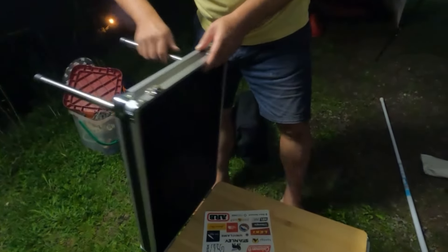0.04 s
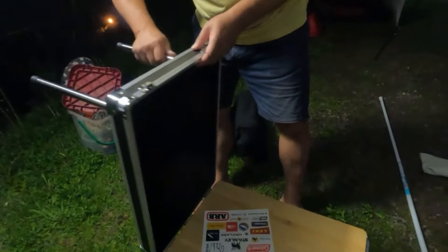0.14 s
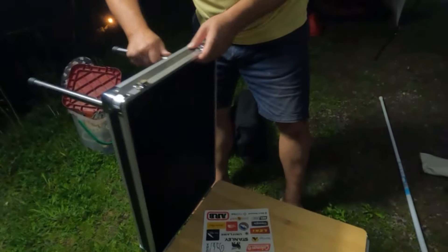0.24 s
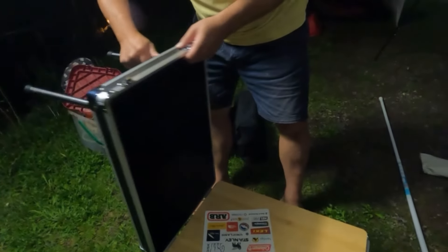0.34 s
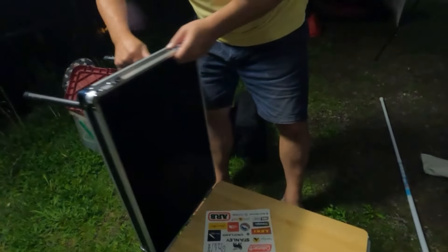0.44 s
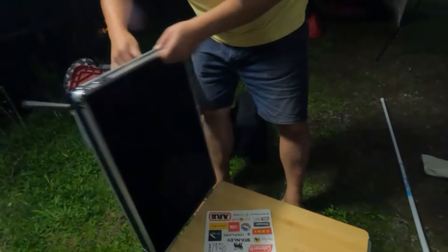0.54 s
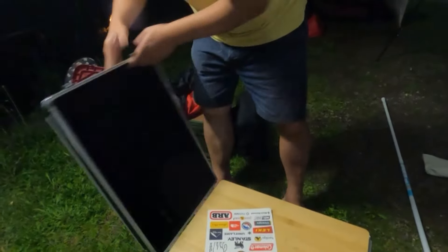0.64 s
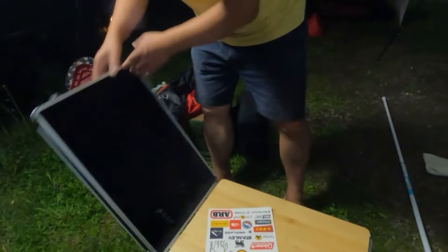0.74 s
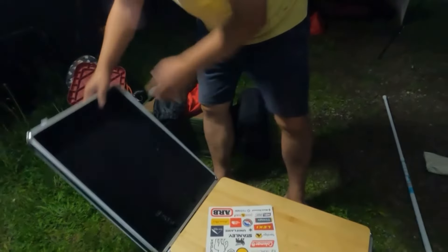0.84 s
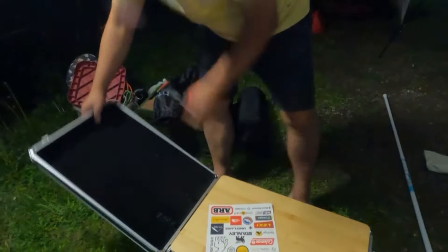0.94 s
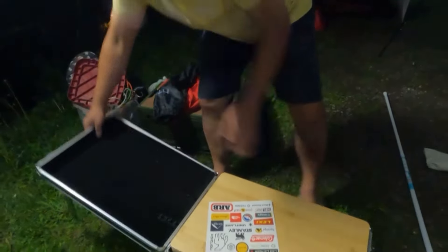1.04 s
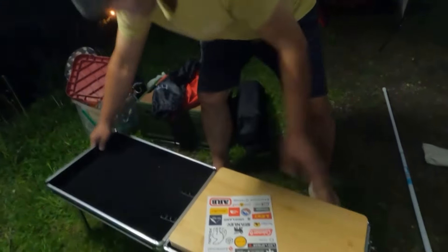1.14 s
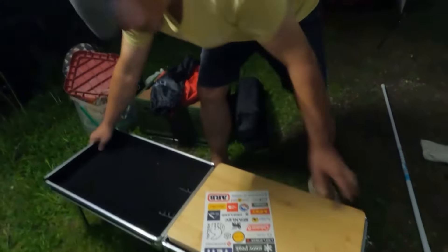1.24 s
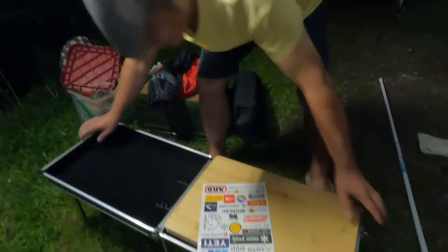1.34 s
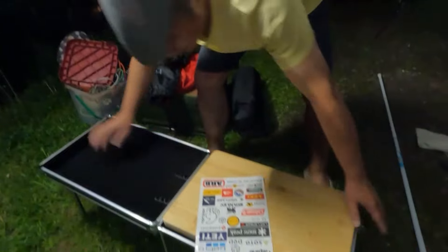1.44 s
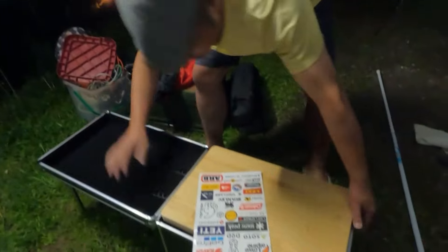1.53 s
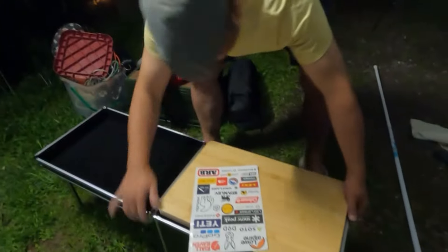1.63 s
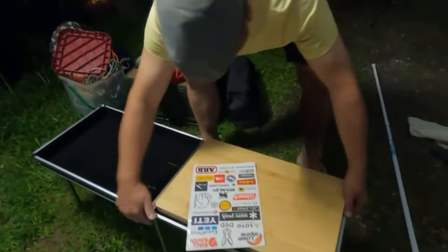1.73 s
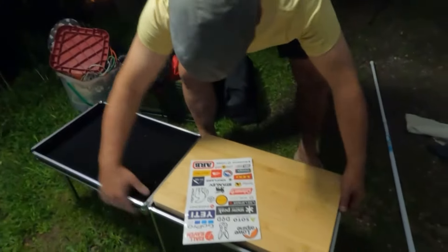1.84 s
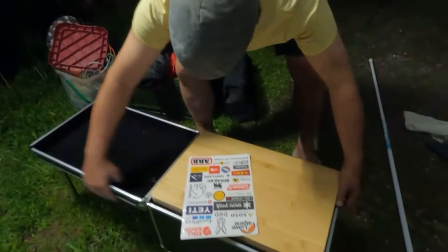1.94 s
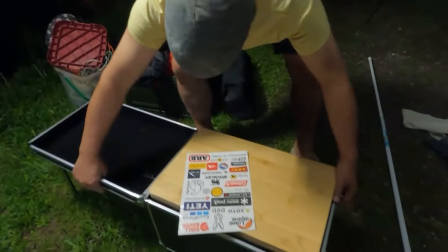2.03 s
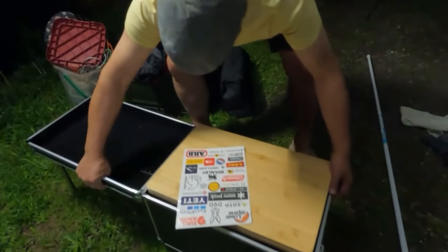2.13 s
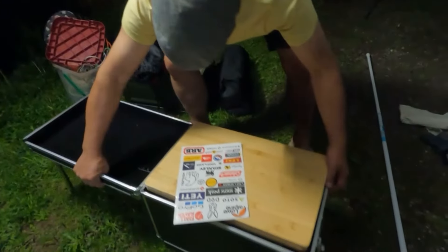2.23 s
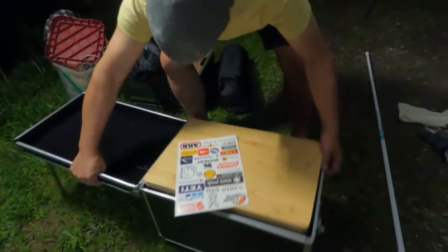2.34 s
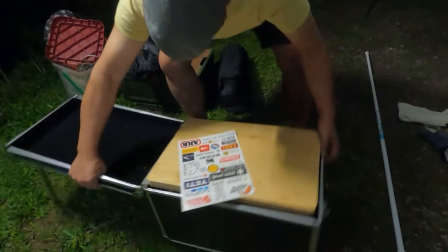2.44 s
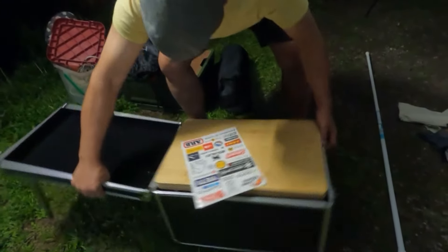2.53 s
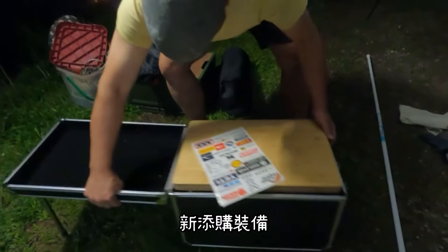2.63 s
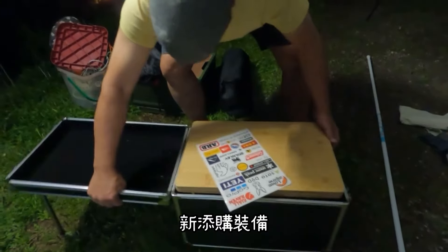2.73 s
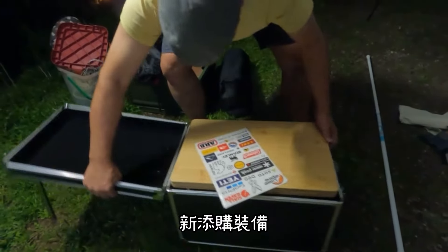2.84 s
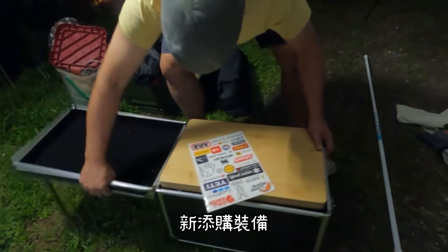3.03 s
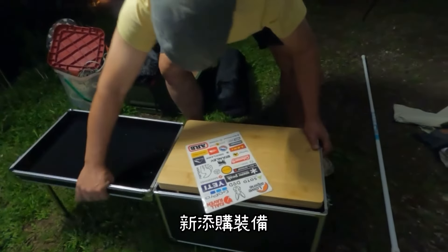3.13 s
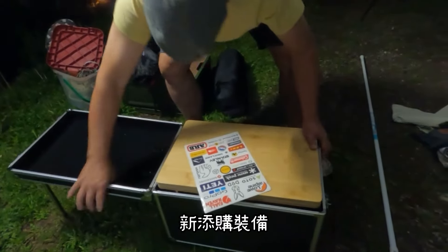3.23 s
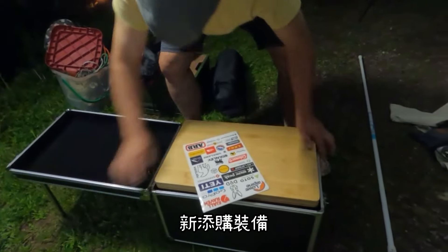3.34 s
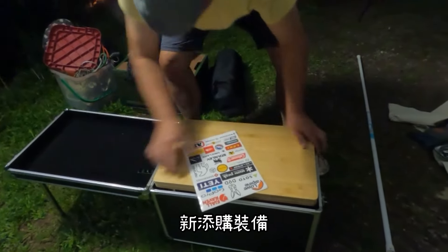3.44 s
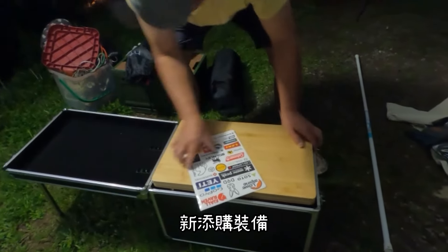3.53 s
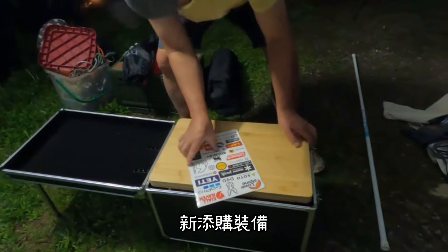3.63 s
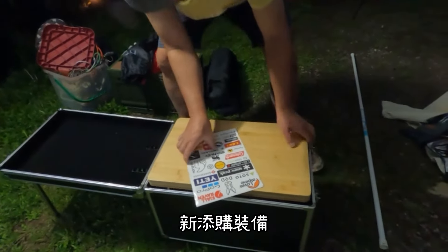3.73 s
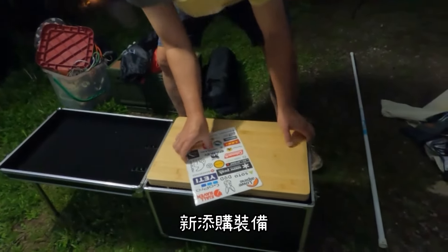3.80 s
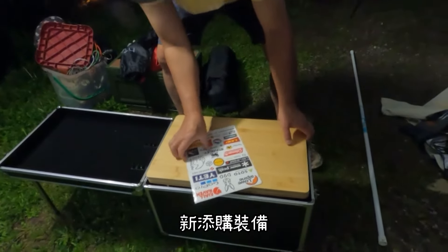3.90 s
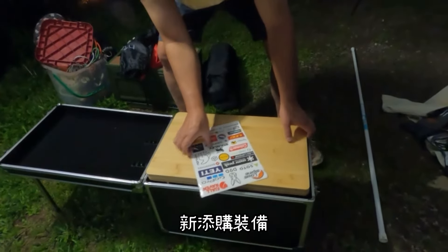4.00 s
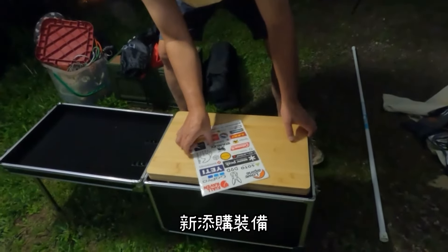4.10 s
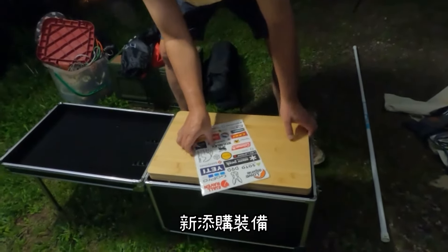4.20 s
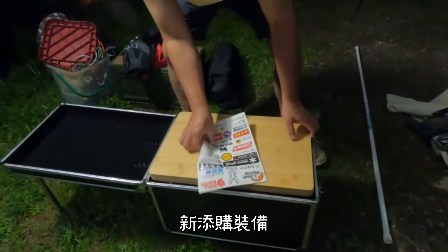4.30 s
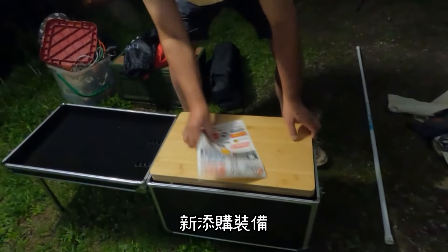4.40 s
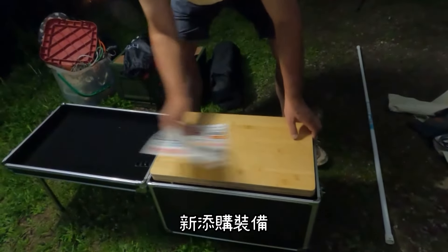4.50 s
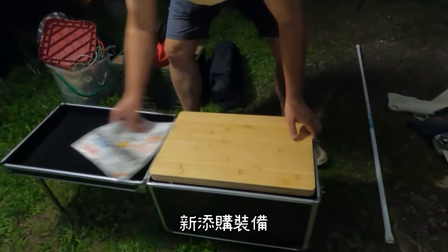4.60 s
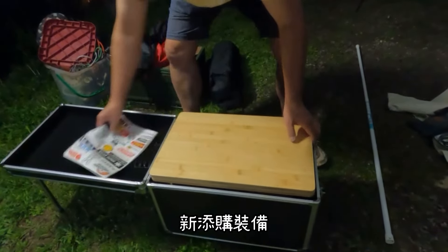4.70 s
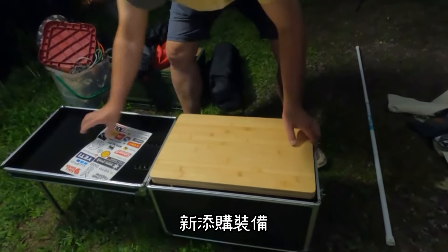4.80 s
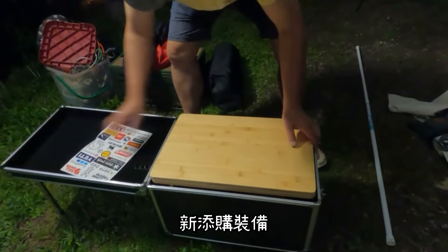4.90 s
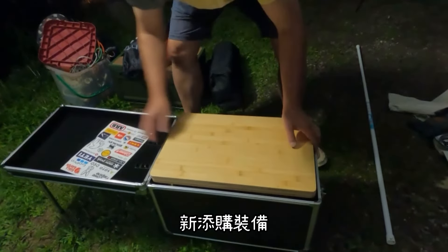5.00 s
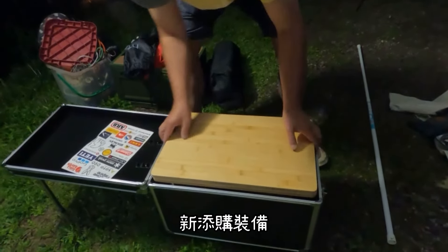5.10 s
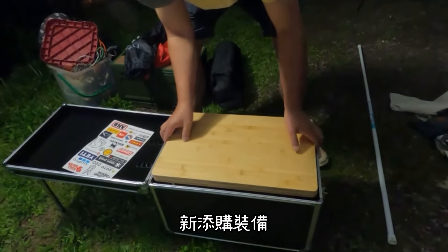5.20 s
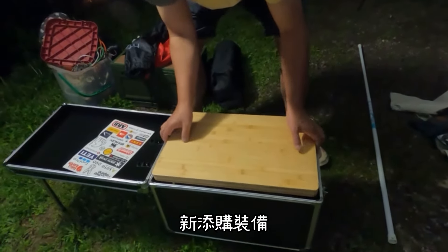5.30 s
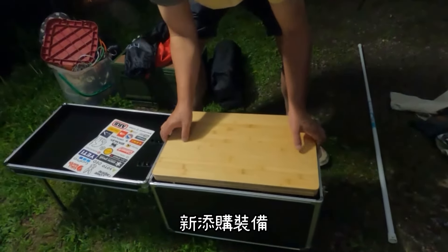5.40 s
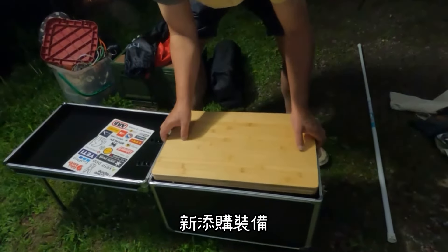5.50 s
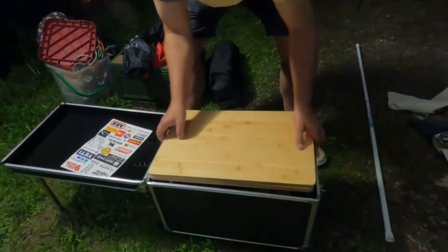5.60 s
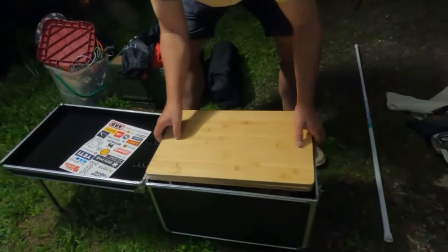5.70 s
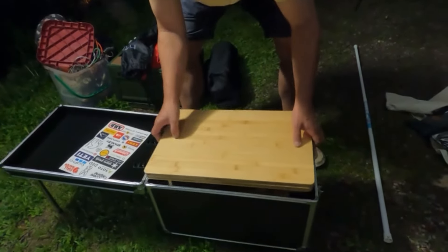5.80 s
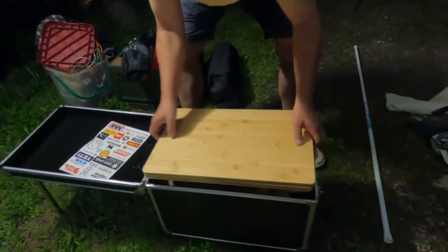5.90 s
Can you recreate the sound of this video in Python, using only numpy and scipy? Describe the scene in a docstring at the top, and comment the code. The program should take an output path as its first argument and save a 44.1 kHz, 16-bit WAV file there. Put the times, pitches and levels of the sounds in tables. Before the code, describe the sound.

A folding camp table with a metal frame and wooden top is opened close by, outdoors at night, over a faint, steady hiss of distant insects. It starts with soft rubbing and low rumbling, and a dull bump at 0.7 seconds. At 1.2 seconds a panel lands with a loud thud and clack. Sharp metal clacks follow around 1.6, 1.8 and 2.1 seconds, with the pivots rubbing between them. From 2.6 to 3.2 seconds the legs scrape and judder over the ground amid a quick run of hollow knocks, loudest at 3.1. From 3.3 seconds a stiff sticker sheet slides over the wood in short hissing strokes, growing louder, popping crisply at 4.4 and dropping into a tray with a clack at 4.7. Lighter knocks come between 5.1 and 5.4 seconds and again at 5.9 as the top is nudged into place.

```python
"""Soft rubbing, then clacks and thuds: a folding camp table is opened on grass at night.
Blows excite the damped modes of its panels and aluminium frame; its legs drag by stick-slip friction.
A sheet of stickers hisses off the wooden top, pops as it bends and is dropped in the tray,
and the top is nudged into place. Behind it all, many insects merge into a steady hiss."""
import sys
import numpy as np
from scipy import signal
from scipy.fft import rfft, irfft, next_fast_len
from scipy.io import wavfile

SR = 44100
rng = np.random.default_rng(int(sys.argv[2]) if len(sys.argv) > 2 else 0)


def dump(signal):
    """Clip the signal to [-1, 1] and save it as 16-bit WAV at the path in sys.argv[1]."""
    limited = np.clip(np.atleast_2d(signal).T, -1, 1)
    pcm = np.round(limited * 32767).astype(np.int16)
    wavfile.write(sys.argv[1], SR, pcm)


N = 262395
TIME = np.arange(N) / SR

# modes of panel, frame and bent sheet: (frequency [Hz], relative level [dB], t60 [s])
PANEL_MODES = [(58.6, 4, 0.2), (80.8, 4, 0.3), (108.2, 1.5, 0.16), (136, 0, 0.28), (158.6, -1.5, 0.34),
               (181.6, 4.5, 0.15), (233, 5, 0.083), (271.5, -1, 0.23), (298, 3.5, 0.094),
               (369.4, -2.5, 0.17), (441, 5, 0.066), (500, 2.5, 0.05)]
FRAME_MODES = [(436, -6, 0.083), (530, -22, 0.098), (710.6, -7.5, 0.13), (994, 1, 0.073), (1066, 2, 0.11),
               (1320, 2, 0.07), (1354, 13, 0.018), (1595, 3, 0.028), (1615, -7, 0.13), (1918, 5.5, 0.046),
               (2056, 5.5, 0.029), (2604, -20, .06), (2760, 10, 0.041), (3250, -14, 0.084),
               (3576, 15.5, 0.046), (3792, 15, 0.039), (4740, -14, 0.042), (4910, 4.5, 0.084),
               (6600, -22, .05)]
SHEET_MODES = [(383, -21.5, 0.11), (944, -5.5, 0.042), (1220, 0, 0.099), (1580, 1, 0.075),
               (1960, -3, 0.024), (2730, 10.5, 0.011), (4940, 11, 0.011)]
# noise spectra: (frequency [Hz], relative spectral density [dB])
FITTINGS_SPECTRUM = [(300, 2.5), (520, -2), (780, -2), (1150, -8), (1700, -3), (2300, 1.5), (3700, -2.5),
                     (4300, -6.5), (6800, -3.5), (8500, -16), (11000, -13), (13000, -22), (15500, -51)]  # dense small modes of tubes and fittings
RUMBLE_SPECTRUM = [(25, -7), (55, 6.5), (80, 10.5), (120, -6.5), (200, 1), (280, 0), (400, -12),
                   (700, -16.5), (1500, -59.5)]
PIVOT_SPECTRUM = [(300, -13), (750, -9), (1000, -0.5), (1300, 3.5), (1600, 1), (1950, 1), (2600, -3.5),
                  (3600, -1.5), (5000, -22), (9000, -58)]
RUSTLE_SPECTRUM = [(1500, -73.5), (3000, -33), (5000, 6.5), (7000, 3), (8500, -8.5), (10500, -4),
                   (12500, -11.5), (15500, -44)]
SCRAPE_SPECTRUM = [(250, -4.5), (500, 3), (750, 3), (1050, 6), (1600, -3.5), (3500, -8), (7000, -18.5),
                   (8500, -27.5), (12000, -30), (15500, -52)]
SHEET_SPECTRUM = [(500, 4), (1100, 16), (1800, 6.5), (3000, 3), (5500, 5), (7000, 1), (8500, -5.5),
                  (11000, 0.5), (13000, -11.5), (15500, -26)]
INSECT_SPECTRUM = [(2600, -53.5), (3200, -17.5), (3550, 3), (3900, 4), (4150, 1.5), (4500, -6.5),
                   (5500, -14.5), (7500, -21), (10000, -35)]
AIR_SPECTRUM = [(20, 0.5), (70, -1.5), (140, 0), (230, -1), (400, -11), (850, -19.5), (1150, -10.5),
                (1700, -16.5), (2800, -19), (6000, -28), (8500, -35), (11000, -27.5), (15000, -63)]
# likeness of left and right for near and far sources: (frequency [Hz], correlation [0-1])
NEAR_COHERENCE = [(90, .999), (250, .992), (500, 0.95), (1200, 0.87), (3000, 0.72), (7000, 0.81),
                  (13000, 0.63)]
FAR_COHERENCE = [(150, 0.35), (1000, 0.54), (4000, 0.45), (12000, .3)]
# blows on a panel: (time [s], thud pitch [Hz], relative thud level [dB],
# relative knock level [dB], clack over knock [dB])
PANEL_BUMPS = [(0.679, 166, -24.5, -45, -21), (1.235, 206, -16, -24, -3), (1.249, 97, -15.5, -33, -11),
               (2.681, 130, -21.5, -24.5, -5.5), (2.729, 135, -15.5, -25, -9.5),
               (2.754, 125, -23.5, -29.5, -30), (2.774, 133, -19.5, -53, -8), (2.851, 106, -24, -39, -10),
               (2.884, 187, -23, -25.5, -26), (2.938, 170, -40, -35.5, -39), (2.964, 190, -45, -29, -3.5),
               (2.999, 191, -21.5, -39, 7), (3.11, 220, -11.5, -24, -3), (3.116, 216, -18.5, -20, -5),
               (4.819, 216, -37.5, -44, 3.5), (5.104, 242, -25, -34.5, -9.5), (5.285, 176, -42, -45, -1.5),
               (5.385, 165, -34, -66, 6), (5.892, 267, -27.5, -32.5, 0.5)]
# light, hard blows on frame and tray: (time [s], clack level [dB], clack over knock [dB])
FRAME_CLACKS = [(0.119, -47.5, 4), (1.223, -37.5, -8), (1.243, -26, 0.5), (1.596, -41, 1),
                (1.617, -21.5, 4.5), (1.63, -28, 2), (1.676, -43, -3), (1.841, -31, 3), (1.931, -48, -1.5),
                (1.99, -39.5, 10), (2.042, -46, 1.5), (2.075, -25.5, 4), (2.086, -43, -2),
                (2.249, -49.5, 2.5), (2.338, -56.5, -8.5), (2.468, -42, -2), (2.598, -39.5, 1),
                (2.696, -30, 5), (3.13, -33.5, -7), (3.185, -28, 3), (3.348, -39, 4), (3.381, -39, 7.5),
                (3.884, -58.5, -0.5), (4.671, -44.5, 0), (4.714, -40.5, -4), (4.731, -26, 1),
                (4.9, -52.5, 0)]
# snaps of fittings and edges: (time [s], level [dB])
EDGE_SNAPS = [(0.681, -47.5), (1.242, -23.5), (2.679, -26.5), (2.77, -29.5), (3.132, -24.5), (3.403, -36),
              (4.088, -43), (5.384, -33)]
# a hand rocks a panel: (time [s], duration [s], level [dB], pitch [Hz])
PANEL_ROCKS = [(0.101, .11, -51, 84), (0.309, 0.53, -53, 83), (0.762, 0.21, -52.5, 92.5),
               (1.058, 0.045, -50.5, 94), (1.303, 0.057, -52, 137), (1.743, 0.064, -48, 148),
               (2.105, 0.052, -48, 148), (2.304, 0.28, -53, 165), (2.382, 0.033, -44, 238),
               (3.21, .3, -55.5, 135), (3.535, 0.053, -47, 129), (3.662, 0.21, -60, 153),
               (4.524, 0.17, -55, 89), (4.828, 0.13, -54, 90), (5.291, 0.036, -44.5, 138),
               (5.535, 0.06, -53, 90), (5.77, 0.06, -52.5, 178)]
# tubes turn, cloth and grass brush: (time [s], duration [s], final rub level [dB], rustle level [dB])
PIVOT_TURNS = [(0, .35, -67.5, -67.5), (0.708, 0.17, -54.5, -65), (0.884, 0.21, -56.5, -66),
               (1.065, 0.11, -51.5, -63), (1.172, .05, -47, -53.5), (1.294, 0.12, -60.5, -69),
               (1.49, 0.15, -62.5, -60.5), (1.733, 0.11, -49, -55), (1.942, 0.27, -57.5, -59.5),
               (2.27, 0.34, -52.5, -62), (3.274, 0.39, -52.5, -62.5), (3.791, 0.12, -56.5, -65),
               (3.995, .28, -57.5, -63.5), (4.742, 0.15, -53, -63.5), (5.52, 0.345, -69.5, -88)]
# shoves over the ground: (time [s], duration [s], judder level [dB], scrape level [dB])
LEG_DRAGS = [(2.601, 0.085, -45, -36), (2.654, 0.051, -38, -36), (2.732, 0.041, -37.5, -36),
             (2.888, 0.055, -38.5, -45), (2.95, .15, -31, -42)]
# strokes of the sheet over the wood: (time [s], duration [s], relative final level [dB])
SHEET_SLIDES = [(3.32, 0.027, -44), (3.38, 0.024, -55), (3.49, 0.14, -46.5), (3.6, 0.039, -42),
                (3.975, 0.014, -43.5), (4.015, 0.028, -44.5), (4.06, 0.14, -57), (4.27, 0.05, -39.5),
                (4.315, 0.108, -38.5), (4.44, 0.09, -35.5), (4.52, 0.033, -34.5), (4.57, 0.067, -38),
                (4.62, 0.039, -36), (4.75, 0.079, -46.5)]
# resonance of the air gap under the lifted sheet: (time [s], frequency [Hz])
GAP_RESONANCE = [(4.27, 2840), (4.33, 2110), (4.41, 1450), (4.49, 2260), (4.615, 3770), (4.7, 2140)]
# the sheet buckles as it leaves the wood: (time [s], level [dB])
SHEET_POPS = [(4.398, -32.5), (4.408, -32.5), (4.415, -22.5)]
# slow swell of the insect chorus: (time [s], relative level [dB])
INSECT_SWELL = [(0, -57), (.3, -53.5), (2.4, -56.5), (4.0, -54.5), (5.2, -55.5), (5.95, -53)]

BLOW_TIME = np.arange(int(0.3 * SR)) / SR  # seconds since an impact
CLACK_THUD_HZ, CLACK_THUD_DB = 242, -9  # level relative to the knock


def impacts():
    """Impact excitation: a blow knocks the board, rings the frame and ticks at the point of contact."""
    t = BLOW_TIME
    out = np.zeros((2, N + len(t)))
    dense = texture(FITTINGS_SPECTRUM, NEAR_COHERENCE, grain_db=1.0)
    frame = mode_waves(FRAME_MODES, t)
    onset = 1 - np.exp(-t / 0.00096)
    knock_fade = onset * double_decay(t, crack_t60=0.015, tail_db=-9.5, tail_t60=0.12)
    clack_fade = onset * double_decay(t, crack_t60=0.017, tail_db=-11.5, tail_t60=0.11)
    tick_fade = onset * double_decay(t, crack_t60=0.014, tail_db=-20, tail_t60=0.14)
    for s, weight_db, knock_db, clack_db, tick_db in impact_levels():
        # crowded small modes act as noise; the frame adds its strong ones
        board, tubes, fittings = (dense[:, i:i + len(t)] for i in rng.integers(N - len(t), size=3))
        low_ring, high_ring = (unit_blow(onset * struck(frame, scatter_db=2.5)) for _ in range(2))
        knock = band(unit_blow(board * knock_fade) + from_db(-8.0) * low_ring, 340, 1950)
        clack = band(unit_blow(tubes * clack_fade) + from_db(-11.5) * high_ring, 1660, 7880)
        tick = band(fittings * tick_fade, 6900, 20000) * from_db([[2.6], [-2.6]])  # to the left
        # harder contacts favour higher modes
        knock_hz = np.interp(clack_db - knock_db, [-12, 2], [940, 1330])
        clack_hz = np.interp(tick_db - clack_db, [-26, -18, -3], [1800, 3400, 5400])
        knock = resonance(knock, knock_hz, q=3.2, gain_db=8.5)
        clack = resonance(clack, clack_hz, q=1.5, gain_db=13.0)
        # heavy blows bring out the hollow voice of the board
        knock = resonance(knock, 474, q=1.0, gain_db=np.interp(weight_db, [-10, 6], [-14, 0]))
        at = int(s * SR)
        for db, part in (knock_db + 1.5, knock), (clack_db, clack), (tick_db, tick):
            out[:, at:at + len(t)] += from_db(db) * unit_blow(part)
    return out[:, :N]


def impact_levels():
    """Energy partition: (time [s], thud over knock [dB], knock [dB], clack [dB], tick [dB])."""
    bumps = [(s, thud_db - db, db, db + hard, db + hard - 12) for s, _, thud_db, db, hard in PANEL_BUMPS]
    clacks = [(s, CLACK_THUD_DB, db - hard, db, db - 19) for s, db, hard in FRAME_CLACKS]
    snaps = [(s, 0, db - 20.5, db, db - 7) for s, db in EDGE_SNAPS]
    return bumps + clacks + snaps


def panel_thuds(rebound_s=0.0108, rebound_db=-8.5, focus_db_per_octave=8.5, damping_db_per_s=108):
    """Modal response: a panel rings near the pitch of the contact, damped by hands and grass."""
    t = BLOW_TIME
    out = np.zeros(N + len(t))
    panel = mode_waves(PANEL_MODES, t)
    envelope = (1 - np.exp(-t / 0.0044)) * from_db(-damping_db_per_s * t)
    bumps = [(s, hz, db) for s, hz, db, _, _ in PANEL_BUMPS]
    rebounds = [(s + rebound_s, hz, db + rebound_db) for s, hz, db in bumps]
    shakes = [(s, CLACK_THUD_HZ, db - hard + CLACK_THUD_DB) for s, db, hard in FRAME_CLACKS]
    for s, pitch_hz, db in bumps + rebounds + shakes:
        octaves = np.log2(np.array(PANEL_MODES)[:, :1] / pitch_hz)
        weights = from_db(-focus_db_per_octave * np.abs(octaves))
        thud = unit_blow(struck(weights * panel, scatter_db=2.0) * envelope)
        at = int(s * SR)
        out[at:at + len(t)] += from_db(db - 0.8) * thud
    return out[:N]


def panel_rocking():
    """Forced vibration: a panel under a hand rumbles around the pitch that the grip leaves free."""
    rumble = texture(RUMBLE_SPECTRUM, NEAR_COHERENCE)
    out = np.zeros((2, N))
    for s, length, db, pitch_hz in PANEL_ROCKS:
        voiced = rms_one(resonance(rumble, pitch_hz, q=4.4, gain_db=11.0))
        out += strokes([(s, length, db)], attack_s=0.018, release_s=0.1) * voiced
    return out


def pivot_rubbing(attack_s=0.021, release_s=0.053):
    """Dry friction: tubes slip unevenly in their pivots while cloth and grass rustle along."""
    s, length, rub_db, rustle_db = np.transpose(PIVOT_TURNS)
    rub = strokes(zip(s, length, rub_db), attack_s, release_s, build_db=3)  # pressure rises
    rub = rub * texture(PIVOT_SPECTRUM, NEAR_COHERENCE, grain_db=2.5)
    rustle = texture(RUSTLE_SPECTRUM, NEAR_COHERENCE, grain_db=2.4)
    rustle *= strokes(zip(s, length, rustle_db), attack_s, release_s)
    return (rub + rustle) * from_db(1.8 * drift(70))


def leg_drag(attack_s=0.0094, release_s=0.05):
    """Stick-slip friction: the feet scrape over the soil and make the panels judder."""
    s, length, judder_db, scrape_db = np.transpose(LEG_DRAGS)
    judder = rms_one(band(texture(RUMBLE_SPECTRUM, NEAR_COHERENCE), 77, 500))
    judder *= strokes(zip(s, length, judder_db), attack_s, release_s)
    scrape = texture(SCRAPE_SPECTRUM, NEAR_COHERENCE, grain_db=2.0)
    scrape *= strokes(zip(s, length, scrape_db), attack_s, release_s)
    return (judder + scrape) * from_db(1.6 * drift(70))


def sheet_sliding(flat_gap_hz=3620):
    """Friction noise: the sheet hisses over the wood, louder as each stroke gathers speed."""
    gap_hz = np.interp(TIME, *np.transpose(GAP_RESONANCE), left=flat_gap_hz)
    hiss = texture(SHEET_SPECTRUM, NEAR_COHERENCE, grain_db=0.7) * from_db(2.35 * drift(150))
    hollow = air_gap(hiss, gap_hz, q=2.8)
    return strokes(SHEET_SLIDES, attack_s=0.013, release_s=0.038, build_db=12) * hollow


def air_gap(x, centre_hz, q, block=128):
    """Cavity resonance: the gap under the sheet acts as a moving resonant high-pass filter."""
    out, state = np.zeros_like(x), np.zeros((2, 2))
    for i in range(0, N, block):
        angle = 2 * np.pi * centre_hz[i] / SR
        radius = np.exp(-angle / (2 * q))
        b, a = [radius, -2 * radius, radius], [1, -2 * radius * np.cos(angle), radius ** 2]
        out[:, i:i + block], state = signal.lfilter(b, a, x[:, i:i + block], zi=state)
    return out


def sheet_pops(crackle_db=-7, crackle_t60=0.034):
    """Snap-through buckling: the stiff sheet flips its curve, rings and crackles at its creases."""
    t = BLOW_TIME
    out = np.zeros((2, N))
    creases = texture(SHEET_SPECTRUM, NEAR_COHERENCE, grain_db=1.8)
    onset = 1 - np.exp(-t / 0.00063)
    for s, db in SHEET_POPS:
        span = slice(int(s * SR), int(s * SR) + len(t))
        ring = unit_blow(struck(mode_waves(SHEET_MODES, t), scatter_db=2.5))
        crackle = unit_blow(creases[:, span] * from_db(-60 * t / crackle_t60))
        out[:, span] += from_db(db) * (ring + from_db(crackle_db) * crackle) * onset
    return out


def reflections(x, t60=0.3, wet_db=-27, delay_s=0.012):
    """Diffuse scattering: ground, tents and trees return a faint, dull tail."""
    t = np.arange(SR // 2) / SR
    decay = from_db(-60 * t / t60) * (t > delay_s)
    scatter = band(rng.standard_normal((2, len(t))), 160, 6200) * decay
    scatter /= np.sqrt(np.sum(scatter ** 2) / 2)
    return from_db(wet_db) * signal.fftconvolve(x, scatter, axes=1)[:, :N]


def night_insects():
    """Incoherent summation: distant insects merge into a shimmering band above the murmur of the air."""
    level_db = np.interp(TIME, *np.transpose(INSECT_SWELL)) - 1.0 + 1.8 * drift(45)
    insects = from_db(level_db) * texture(INSECT_SPECTRUM, FAR_COHERENCE)
    return insects + from_db(-60.5) * texture(AIR_SPECTRUM, FAR_COHERENCE)


def mode_waves(modes, t):
    """Free vibration: each mode is a damped sine."""
    hz, db, t60 = np.transpose(modes)[:, :, None]
    return from_db(db) * np.sin(2 * np.pi * hz * t) * from_db(-60 * t / t60)


def struck(waves, scatter_db):
    """Modal superposition: random strengths and signs stand for where the blow lands."""
    strengths = from_db(scatter_db * rng.standard_normal(len(waves)))
    return (strengths * rng.choice([-1, 1], len(waves))) @ waves


def double_decay(t, crack_t60, tail_db, tail_t60):
    """Two-slope decay: a quick crack and the longer buzz of loose joints add in power."""
    return np.hypot(from_db(-60 * t / crack_t60), from_db(tail_db - 60 * t / tail_t60))


def strokes(rows, attack_s, release_s, build_db=0):
    """Power summation of moves: each sets in, builds to its level, then falls 20 dB per release time."""
    power = np.zeros(N)
    for s, length, db in rows:
        onset = np.clip((TIME - s) / attack_s, 0, 1)
        to_go = np.clip((s + length - TIME) / length, 0, 1)
        fall_db = 20 * np.clip((TIME - s - length) / release_s, 0, 10)
        power += (onset * from_db(db - build_db * to_go - fall_db)) ** 2
    return np.sqrt(power)


def texture(spectrum, coherence, grain_db=0):
    """Spectral shaping: stereo noise of rms 1, with grain for tiny contacts of uneven size."""
    size = next_fast_len(N, real=True)
    hz = np.arange(size // 2 + 1) * SR / size
    grains = np.repeat(rng.exponential(1, size), 32)[:size]
    mid, side = rfft(rng.standard_normal((2, size)) * from_db(grain_db * np.minimum(grains, 5)))
    alike = np.clip(at_hz(coherence, hz), 0, 1)
    stereo = np.sqrt(1 + alike) * mid + np.sqrt(1 - alike) * side * [[1], [-1]]
    return rms_one(irfft(stereo * from_db(at_hz(spectrum, hz)), size)[:, :N])


def drift(rate_hz):
    """Random modulation: a wandering curve of rms 1."""
    knots = rng.standard_normal(2000)
    return rms_one(np.interp(TIME * rate_hz, np.arange(len(knots)), knots))


def resonance(x, centre_hz, q, gain_db):
    """Parallel resonance: a tuned band is added to the signal."""
    return x + from_db(gain_db) * signal.lfilter(*signal.iirpeak(centre_hz, q, fs=SR), x)


def band(x, low_hz, high_hz):
    return signal.sosfilt(signal.butter(3, [low_hz, high_hz], "band", fs=SR, output="sos"), x)


def at_hz(points, hz):
    knots, values = np.transpose(points)
    return np.interp(np.log(hz + 1), np.log(knots), values)


def unit_blow(x):
    """Energy normalisation: equal to 10 ms at rms 1."""
    return x / np.sqrt(np.mean(np.sum(x ** 2, axis=-1)) / (SR / 100) + 1e-20)


def rms_one(x):
    return x / np.sqrt(np.mean(x ** 2) + 1e-20)


def from_db(db):
    return 10 ** (np.asarray(db) / 20)


def scene():
    """Superposition: the table and sheet close by, their reflections and the night all round."""
    table = impacts() + panel_thuds() + panel_rocking() + pivot_rubbing() + leg_drag()
    direct = table + sheet_sliding() + sheet_pops()
    return direct + reflections(direct) + night_insects()


def record(dry, cutoff_hz=15600):
    """Band limiting: a steep low-pass filter removes the highest treble."""
    return signal.sosfilt(signal.ellip(10, .1, 80, cutoff_hz, fs=SR, output="sos"), dry)


dry = scene()
out = record(dry)
dump(out)
```